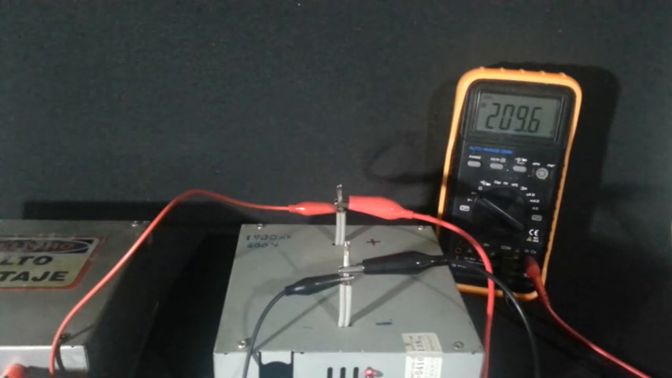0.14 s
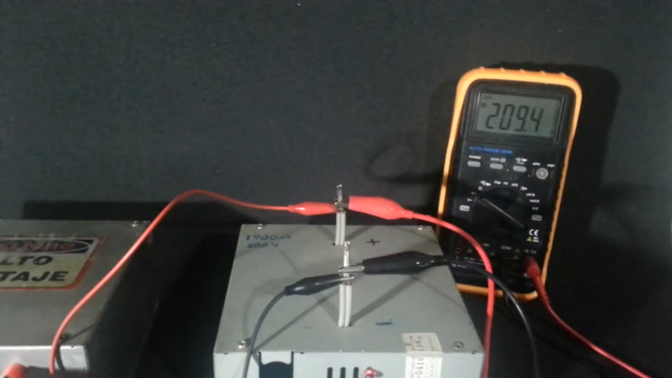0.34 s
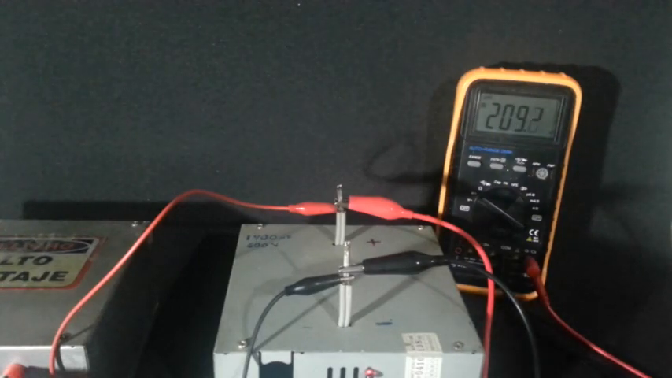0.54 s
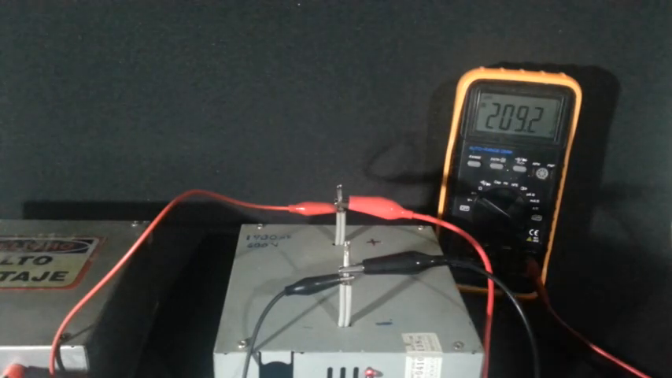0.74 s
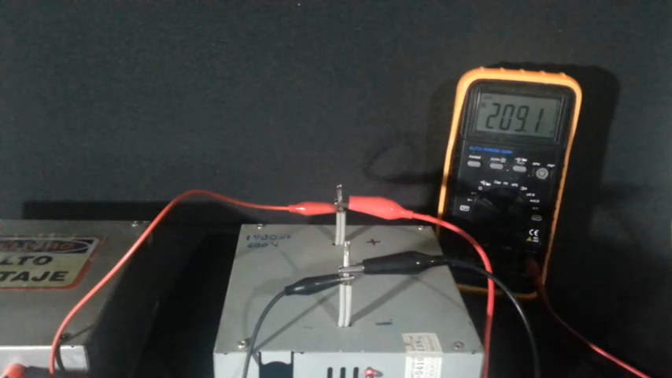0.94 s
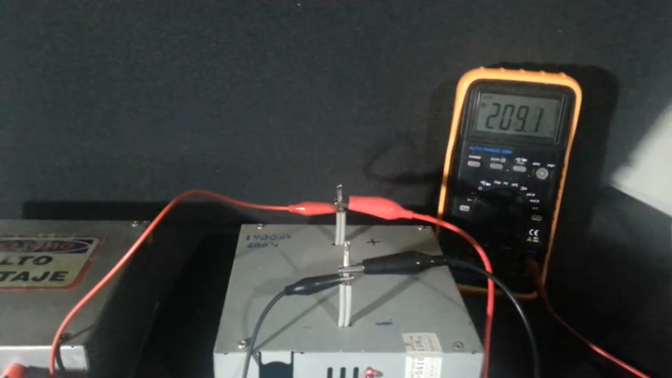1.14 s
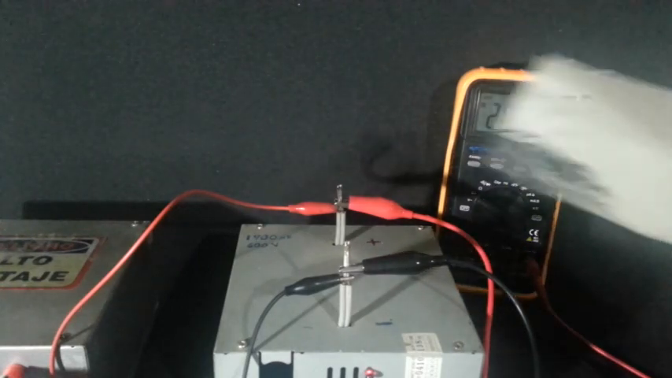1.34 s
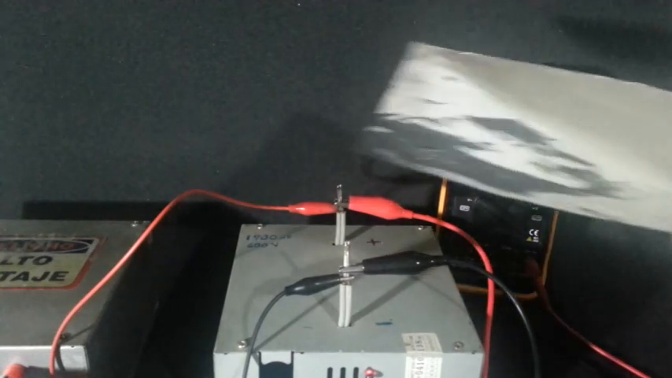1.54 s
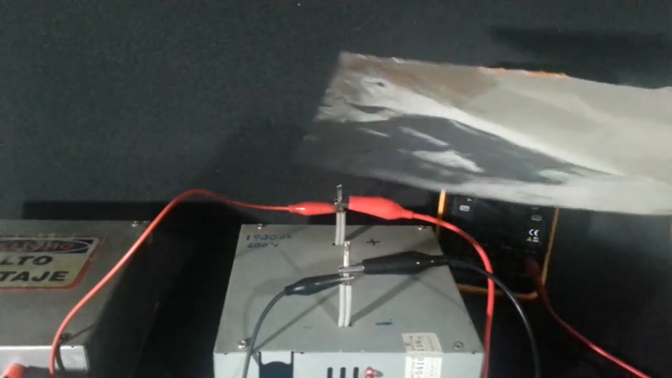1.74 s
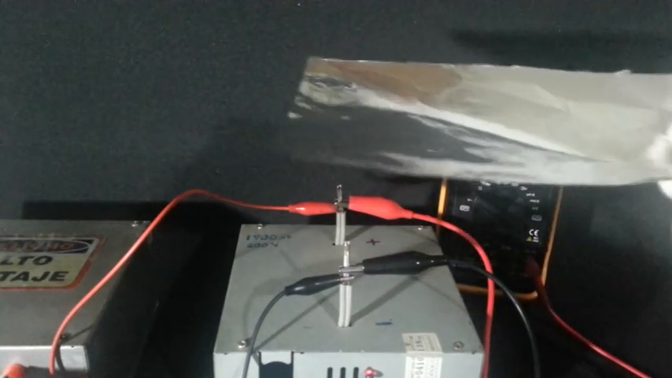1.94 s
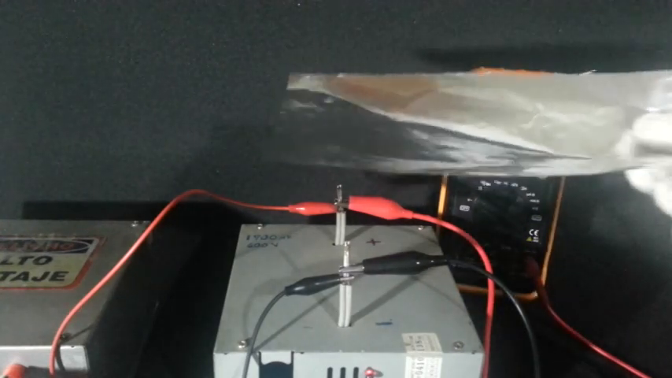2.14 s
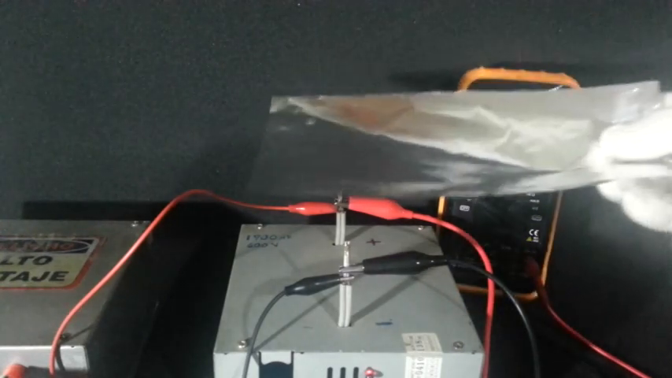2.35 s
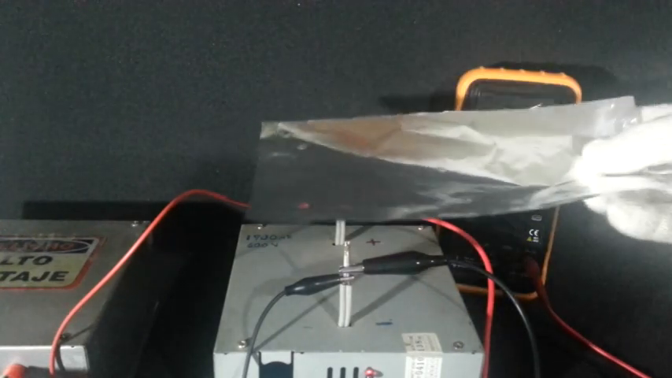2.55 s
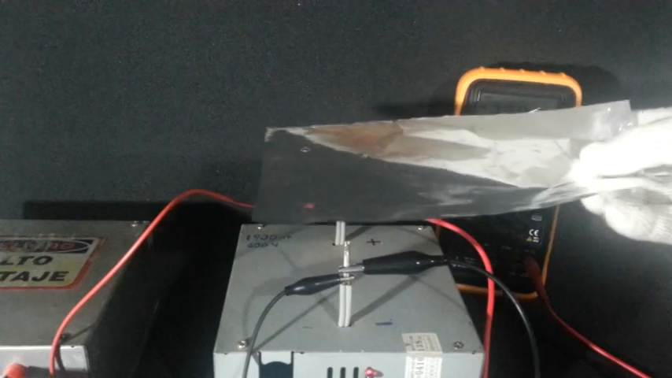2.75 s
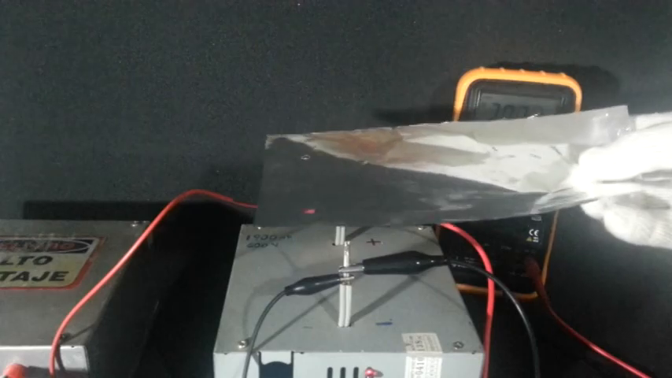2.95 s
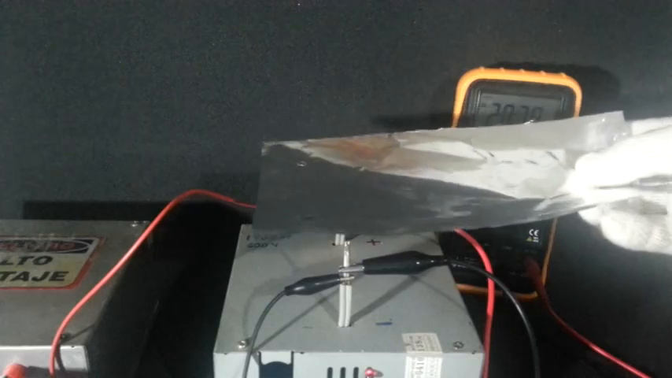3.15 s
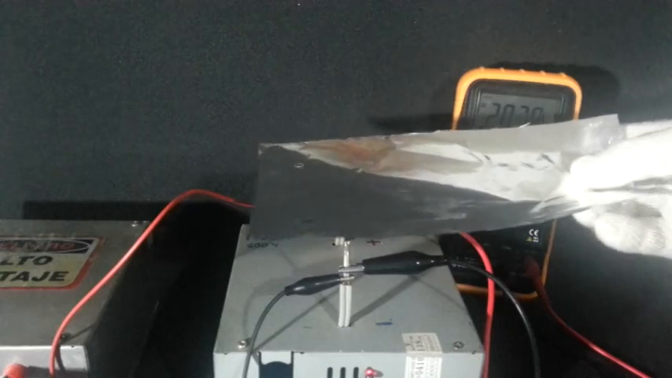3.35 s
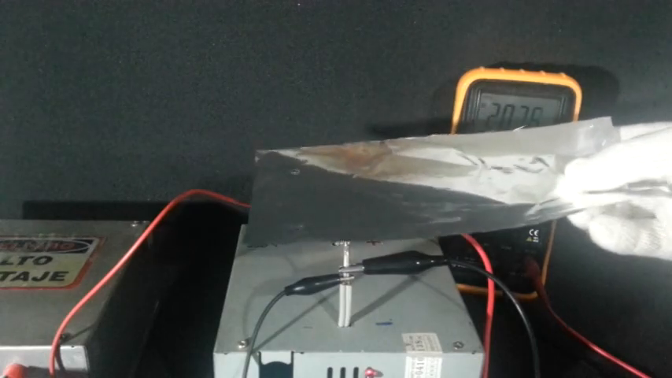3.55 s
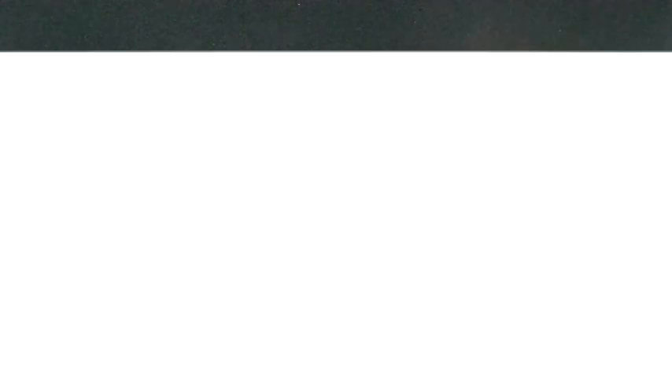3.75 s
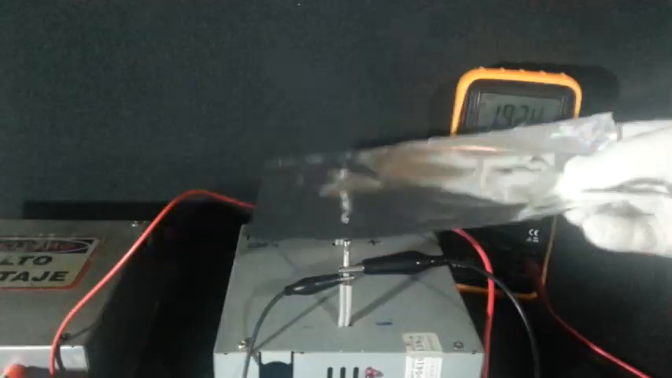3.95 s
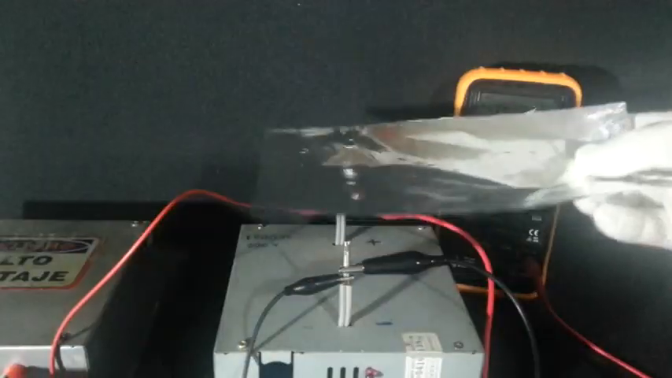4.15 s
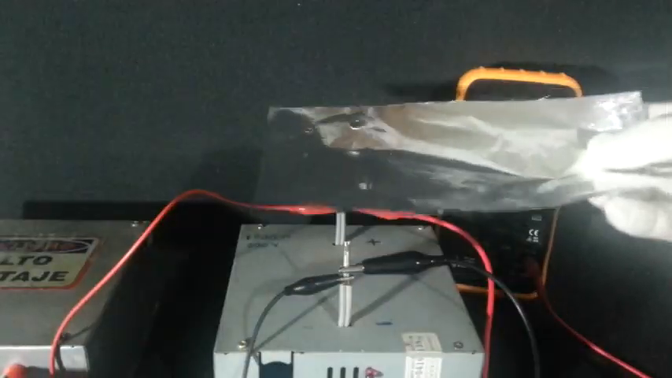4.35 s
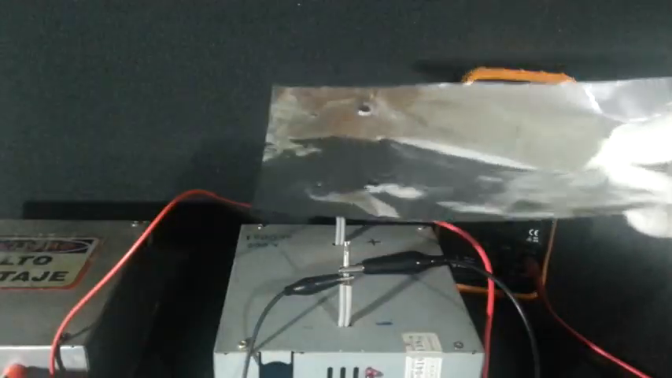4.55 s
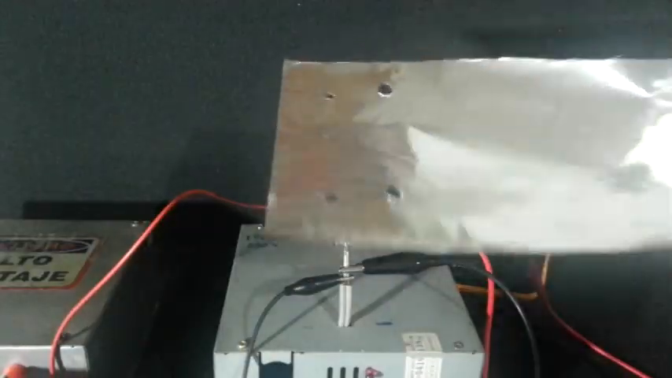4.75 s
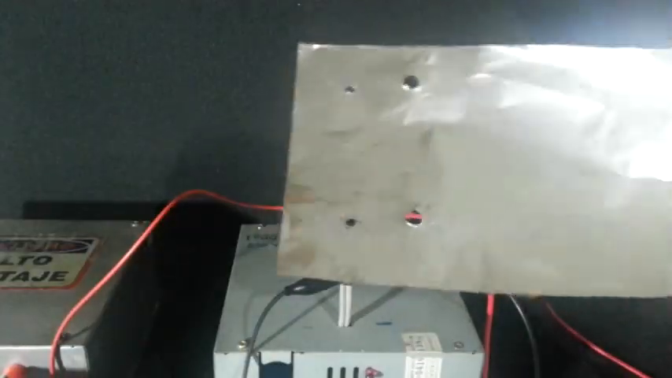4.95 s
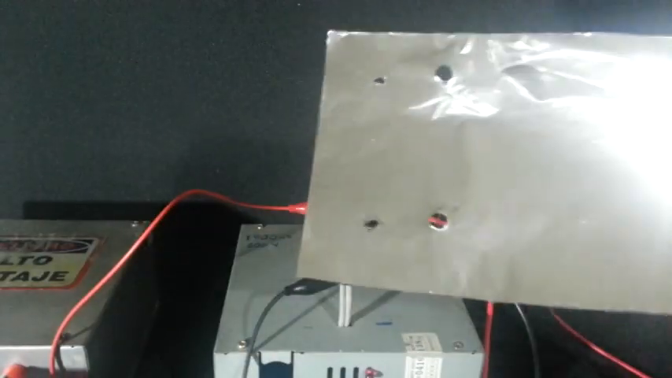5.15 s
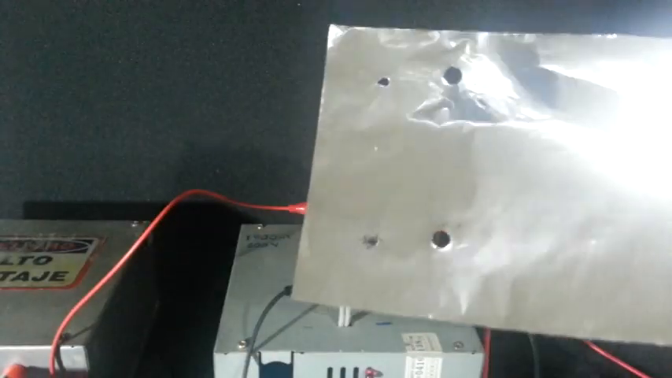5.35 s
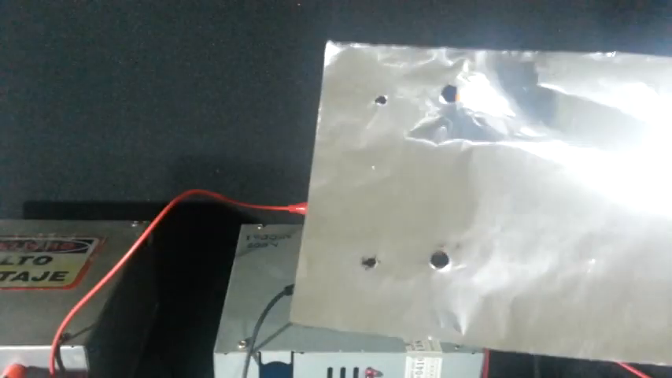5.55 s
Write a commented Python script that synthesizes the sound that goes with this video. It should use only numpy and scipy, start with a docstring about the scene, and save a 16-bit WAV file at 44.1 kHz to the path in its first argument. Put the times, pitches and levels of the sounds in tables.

```python
"""Metal foil in a bare, echoing room, over a faint equipment hum, a wavering rumble and steady hush.
First the foil snaps and crinkles in the hand: short clumps of clicks coloured by the buckling panel, and fine ticks.
At 3.75 s it shorts a charged capacitor bank: one spark crack, a shock front convolved with a decaying noise tail,
overloads the microphones. Room modes ring on as decaying sines, and a neighbouring space answers late.
From 4.4 s the foil snaps and crinkles again."""
import sys
import numpy as np
from scipy import signal
from scipy.fft import rfft, irfft
from scipy.io import wavfile
from scipy.ndimage import map_coordinates

SR = 44100
rng = np.random.default_rng(int(sys.argv[2]) if len(sys.argv) > 2 else 0)


def wav_record(signal):
    """Record a signal, one row per channel, as 16-bit PCM in the file named by sys.argv[1]."""
    frames = np.transpose(np.atleast_2d(signal))
    bounded = np.clip(frames, -1, 1)
    # unit amplitude maps onto the largest positive 16-bit level
    quanta = np.round(bounded * 32767).astype(np.int16)
    wavfile.write(sys.argv[1], SR, quanta)


def volts_from_decibels(level):
    """Turn decibel levels (scalar or array-like) into linear amplitude factors."""
    exponent = np.asarray(level, float) / 20
    return 10 ** exponent


N = 247118

# Spark: one row of t/s, shock level/dB, greatest depth of the negative offset before the side gains/dB,
# time from the start of the offset to its greatest depth/s
SPARK = (3.7465, 35.5, -7, .0035)
# Spectral shape of the spark as the walls return it: f/Hz, density/dB per Hz (relative)
SPARK_COLOUR = [(40, -40), (110, -18), (170, -13), (240, -7), (400, -4), (650, -7), (1200, -5), (2200, -7),
                (4100, -1), (6300, -7), (9000, -6), (13000, -12), (14400, -16), (15000, -40)]
# Modes rung by the spark, four low ones of the room and two thin lingering rings:
# f/Hz, level before the onset and decay factors/dB, decay time T60/s, rise constant/s
ROOM_MODES = [(62, -24, 1.0, .3), (126, -16, .65, .025), (258, -8, .3, .02), (430, -13, .35, .03),
              (1238, -23, .9, .09), (1405, -26, 1.0, .12)]
# Decay of the walls: f/Hz, T60/s
WALL_DECAY = [(100, .6), (300, .6), (700, .68), (1150, .76), (1300, .93), (1450, .76), (2500, .74),
              (4000, .75), (6000, .68), (10000, .55), (15000, .45)]
# Late answer of a neighbouring space: one row of delay/s, rise/s, level for the spark/dB
ANNEX = (.15, .07, -9)
# Left-right likeness setting of the room tail: f/Hz, correlation (1 = alike, 0 = unrelated)
ROOM_LIKENESS = [(60, 0.73), (180, 0.81), (550, 0.33), (1650, 0.01), (4960, -0.02), (15000, -0.01)]
# Foil snaps: t/s, level before the direct and wall gains/dB, treble lift/dB, panel f/Hz, length/s
SNAPS = [(0.0004, -4, 1, 4500, .0022), (0.178, -8, 3, 850, .0003), (0.5207, -25, 0, 560, .002),
         (0.6374, -28, 0, 1710, .003), (0.7193, -7, 2, 2900, .0007), (0.8011, -13, 2, 3000, .0115),
         (0.832, -13, -2, 450, .03), (1.1608, -23, -8, 2150, .033), (1.259, -18, -5, 1250, .023),
         (1.2984, -14, 3, 3400, .018), (1.4027, -19, -4, 1950, .03), (1.5559, -22, -9, 1280, .006),
         (1.6224, -25, -5, 2030, .0033), (1.7494, -26, -9, 2310, .04), (2.0827, -21, 4, 3000, .01),
         (2.1044, -22, -3, 2400, .0026), (2.2179, -26, -8, 2000, .0005), (2.2924, -26, -8, 2000, .04),
         (2.4882, -24, -6, 920, .026), (2.5611, -22, 2, 4800, .005), (2.6394, -28, -4, 1500, .02),
         (2.806, -20, 6, 4500, .009), (2.8255, -18, 0, 2500, .0035), (3.0884, -28, -7, 1640, .009),
         (3.1604, -29, -7, 1500, .017), (3.3424, -29, -4, 2300, .01), (4.4184, -17, 1, 2000, .01),
         (4.5461, -18, -1, 480, .01), (4.5695, -11, 4, 440, .017), (4.6194, -17, -8, 2400, .0135),
         (4.7716, -14, 3, 420, .0044), (4.8144, -21, -2, 1220, .002), (4.8673, -16, 3, 870, .003),
         (4.9097, -14, -4, 2430, .018), (5.0135, -22, -11, 1730, .008), (5.0644, -25, -5, 1220, .01),
         (5.1337, -20, -10, 1730, .009), (5.2265, -18, -6, 2350, .002)]
# Spectral shape of a snap: f/Hz, density/dB per Hz (relative)
FOIL_COLOUR = [(120, -36), (300, -12), (700, -9), (1100, -11), (2400, -4), (4500, -6), (6000, -12),
               (10600, -14), (14400, -18), (14900, -45)]
# Place of the hand, drifting from the left to the middle and part way back:
# t/s, left-over-right level of the snaps' wall sound/dB
HAND = [(0, 3.5), (.8, 4.5), (1.5, 3), (2.1, 1.5), (2.8, .3), (4.4, 1), (5.2, 2.5)]
# Fine crinkling between the snaps: t/s, level/dB
CRINKLE = [(0.0, -58), (0.11, -58), (0.29, -71), (0.57, -72), (0.9, -60), (1.11, -61), (1.46, -61),
           (1.75, -64), (1.95, -69), (3.1, -71), (3.6, -75), (4.45, -58), (4.62, -63), (4.9, -60),
           (5.13, -62), (5.3, -73), (5.6, -75)]
# Tilt of the crinkling, added to the foil colour: f/Hz, level/dB
CRINKLE_TILT = [(750, 7), (1250, 6), (2200, 0), (4000, -2), (6000, -6)]
# Far rumble, before its random wavering: t/s, level/dB
RUMBLE = [(0.0, -74), (0.4, -61), (0.65, -69), (1.4, -74), (2.0, -68), (2.25, -62), (2.55, -71), (3.3, -66),
          (4.55, -64), (4.85, -73), (5.25, -71), (5.6, -65)]
# Spectral shape of the rumble: f/Hz, level/dB (relative)
RUMBLE_COLOUR = [(25, -30), (48, -12), (59, 2), (70, -5), (92, 0), (150, -40), (300, -120)]
# Spectral shape of the room hush and microphone hiss: f/Hz, density/dB per Hz (relative)
HUSH_COLOUR = [(25, -38), (60, -24), (100, -7), (125, -4), (190, -5), (230, -2), (290, -8), (500, -10),
               (1000, -15), (2000, -20), (4000, -25), (6300, -28.5), (10000, -26), (14400, -26),
               (14800, -70)]
# Left-right likeness setting of hush and rumble: f/Hz, correlation (1 = alike, 0 = unrelated)
HUSH_LIKENESS = [(60, 0.69), (240, 0.45), (950, 0.14), (3760, 0.03), (15000, -0.02)]
# Equipment hum, before its wavering and the side gains: f/Hz, rms level/dB
HUM = [(59.4, -75), (119.8, -66), (243.6, -65), (412.4, -76), (589.2, -77), (648.4, -77)]


def spark():
    """Impulsive excitation: one shock front, nearly all of it heard as the ringing room."""
    s, shock_db, offset_db, offset_s = SPARK
    track = np.zeros((2, N))
    t = np.arange(2 * SR) / SR
    front = coloured([1], SPARK_COLOUR)
    room = walls(size=len(t), near_db=2.5, near_t60=.45, annex_db=ANNEX[2], spread=.006)
    add(track, volts_from_decibels(shock_db) * signal.fftconvolve(front[None], room, axes=1), s)
    add(track, volts_from_decibels(shock_db - 25) * front[None], s)  # direct sound
    # A brief negative offset of the overloaded input after the crack, stronger on the right
    offset = -volts_from_decibels(offset_db) * t / offset_s * np.exp(1 - t / offset_s)
    modes = sum(ring(t, *mode) for mode in ROOM_MODES)
    add(track, offset * volts_from_decibels([[-1.5], [1.5]]) + modes, s)
    return track


def ring(t, hz, db, t60, rise):
    """Modal resonance: an exponentially decaying sine, out of phase by 0.7 rad between the two ports."""
    decay = volts_from_decibels(db - 60 * t / t60)
    onset = (1 - np.exp(-t / rise)) ** 2
    return decay * onset * np.sin(2 * np.pi * hz * t + [[.35], [-.35]])


def walls(size, near_db, near_t60, annex_db, spread):
    """Reverberation: noise decaying as quick nearby echoes, a long tail and a late answer from next door."""
    hz, t, z = pair(size, ROOM_LIKENESS, window=256)
    fall = -60 / along(WALL_DECAY, hz)[:, None]  # dB per second
    annex_delay, annex_rise, _ = ANNEX
    late = t - annex_delay
    annex = volts_from_decibels(annex_db + fall * late) * np.clip(late / annex_rise, 0, 1)
    near = volts_from_decibels(near_db - 60 * t / near_t60)
    power = volts_from_decibels(fall * t) ** 2 + near ** 2 + annex ** 2
    # A source that lasts smears the decay
    power = signal.lfilter([1], [1, -np.exp(-t[1] / spread)], power)
    tail = signal.istft(z * np.sqrt(power), SR, nperseg=256)[1]
    return tail / np.linalg.norm(tail[0])


def snaps():
    """Buckling instability: each snap is a click or clump of clicks, heard directly and off the walls."""
    track = np.zeros((2, N))
    t = np.arange(SR // 10) / SR
    draws = rng.standard_normal((len(SNAPS), 2, len(t)))
    for (s, db, treble_db, hz, length), (clicks, size) in zip(SNAPS, draws):
        swell = 1 - np.exp(-t / (.25 * length))
        clump = clicks * volts_from_decibels(5 * size) * np.exp(-t / (2 * length)) * swell
        clump = clump / np.linalg.norm(clump)
        # Weaker snaps are slow flexes with more bass
        tilt = [(700, -2 - .25 * db), (1500, 0), (4200, 0), (7000, treble_db)]
        close = volts_from_decibels(db) * coloured([1], FOIL_COLOUR, tilt, panel(hz, peak_db=19))
        click = volts_from_decibels(db) * coloured([1], FOIL_COLOUR, tilt, panel(hz, peak_db=13))
        pan_db = np.interp(s, *np.transpose(HAND))
        sides = volts_from_decibels([[pan_db / 2], [-pan_db / 2]])
        # From the left, the direct sound reaches the right port later
        lag = round(pan_db * 4)  # samples
        near = signal.fftconvolve(close, clump)
        direct = np.array([np.pad(near, (0, lag)), np.pad(near, (lag, 0))])
        add(track, volts_from_decibels(-3) * sides ** 1.8 * direct, s)
        room = walls(size=SR // 2, near_db=11, near_t60=.25, annex_db=-20, spread=length)
        echoes = signal.fftconvolve(click[None], room, axes=1)
        add(track, volts_from_decibels(2.5) * sides * echoes, s + .001)
    return track


def panel(hz, peak_db):
    """Plate resonance: the flat patch that buckles peaks at its pitch; small, high patches ring less."""
    small_db = 3.5 * max(np.log2(hz / 600), 0)  # 3.5 dB per octave above 600 Hz
    return [(hz * .91, 0), (hz, peak_db - small_db), (hz * 1.09, 0)]


def crinkle():
    """Superposition of many tiny random ticks of the foil, blurred by reverberation."""
    tick_db = 6 * rng.standard_normal(N) + 5 * wobble(25)
    ticks = rng.standard_normal(N) * volts_from_decibels(tick_db)
    ticks = coloured(ticks, FOIL_COLOUR, CRINKLE_TILT)
    room = walls(size=SR // 2, near_db=15, near_t60=.2, annex_db=-21, spread=.003)
    wet = signal.fftconvolve(ticks[None], room, axes=1)[:, :N]
    return volts_from_decibels(curve(CRINKLE)) * unit(wet)


def hum():
    """Additive tones: sines of the equipment, wavering slowly in level and phase, stronger on the right."""
    t = np.arange(N) / SR
    tones = np.zeros(N)
    for hz, db in HUM:
        level = np.sqrt(2) * volts_from_decibels(db + 2.2 * wobble(6))  # rms to peak
        tones += level * np.sin(2 * np.pi * hz * t + .6 * wobble(8))
    return volts_from_decibels([[-1.2], [1.2]]) * tones


def rumble():
    """Band-limited noise: a far low rumble under a slowly wavering envelope."""
    noise = diffuse_noise(RUMBLE_COLOUR, window=4096)
    return volts_from_decibels(curve(RUMBLE) + 2.5 * wobble(6)) * noise


def hush():
    """Stationary noise: the steady room hush and microphone hiss."""
    return volts_from_decibels(-56) * diffuse_noise(HUSH_COLOUR, window=2048)


def diffuse_noise(colour, window):
    """Diffuse field: noise shaped in frequency, with likeness between the sides set by frequency; rms 1."""
    hz, _, z = pair(N, HUSH_LIKENESS, window)
    shaped = z * volts_from_decibels(along(colour, hz))[:, None]
    return unit(signal.istft(shaped, SR, nperseg=window)[1][:, :N])


def pair(size, alike, window):
    """Interaural coherence: STFTs of two mixtures of independent noises, their correlation set by frequency."""
    hz, t, (a, b) = signal.stft(rng.standard_normal((2, size)), SR, nperseg=window)
    angle = np.arccos(np.clip(along(alike, hz), -1, 1))[:, None] / 2
    shared, apart = np.cos(angle) * a, np.sin(angle) * b
    return hz, t, np.array([shared + apart, shared - apart])


def coloured(x, *spectra):
    """Causal filtering by the minimum-phase response of the summed (f/Hz, level/dB) spectra, of energy 1."""
    size = 4096
    hz = np.fft.rfftfreq(size, 1 / SR)
    cepstrum = irfft(np.log(volts_from_decibels(sum(along(points, hz) for points in spectra))))
    # Folding the cepstrum onto positive times makes the response causal
    fold = np.r_[1, 2 * np.ones(size // 2 - 1), 1, np.zeros(size // 2 - 1)]
    response = irfft(np.exp(rfft(cepstrum * fold)))
    return signal.fftconvolve(x, response / np.linalg.norm(response))


def along(points, hz):
    """Interpolation of (f/Hz, value) points on a logarithmic frequency axis."""
    f, v = np.transpose(points)
    return np.interp(np.log(hz + 1), np.log(f + 1), v)


def curve(rows):
    """Linear interpolation of (t/s, value) rows to one value per sample."""
    s, v = np.transpose(rows)
    return np.interp(np.arange(N) / SR, s, v)


def wobble(rate):
    """Slow random modulation: a smooth curve through random knots, rate of them per second."""
    knots = rng.standard_normal(N // 1000)
    return map_coordinates(knots, [np.arange(N) * rate / SR])


def unit(x):
    """Normalisation to rms 1."""
    return x / np.sqrt(np.mean(x ** 2) + 1e-20)


def add(track, x, s):
    """Linear superposition: mixes x into the track from time s."""
    part = track[:, max(round(s * SR), 0):][:, :x.shape[1]]
    part += x[:, :part.shape[1]]


def scene():
    """Linear superposition of all sources at the two microphones."""
    return spark() + snaps() + crinkle() + hum() + rumble() + hush()


def low_pass(x):
    """Removes everything above the highest recorded frequency."""
    return signal.sosfilt(signal.butter(12, 15560, fs=SR, output="sos"), x)


def record(dry):
    """Saturation: the input overloads on the crack, bending smoothly towards a ceiling of 1.02."""
    clipped = dry / (1 + np.abs(dry / 1.02) ** 6) ** (1 / 6)  # just above full scale
    return low_pass(clipped)


dry = scene()
out = record(dry)
wav_record(out)
```